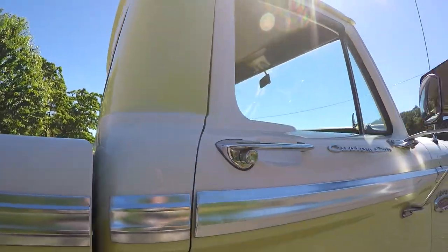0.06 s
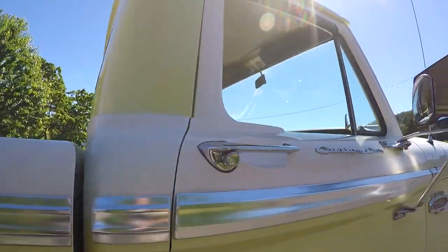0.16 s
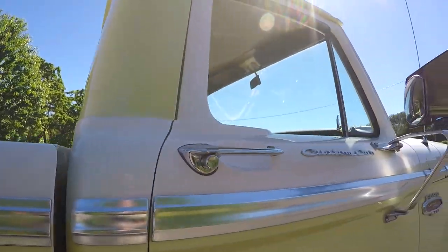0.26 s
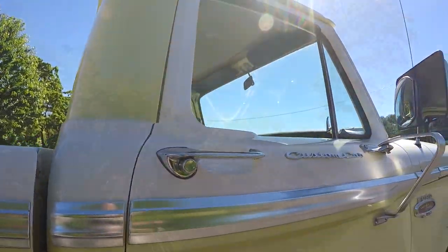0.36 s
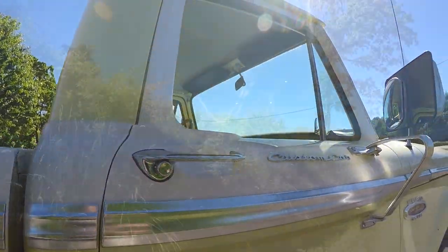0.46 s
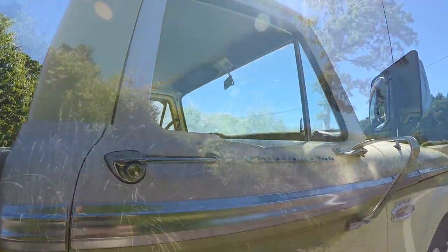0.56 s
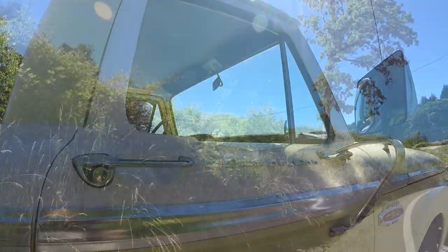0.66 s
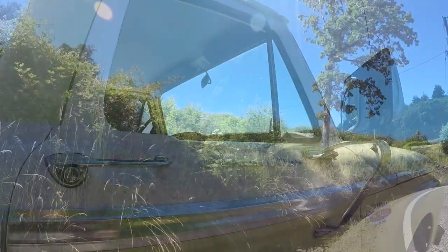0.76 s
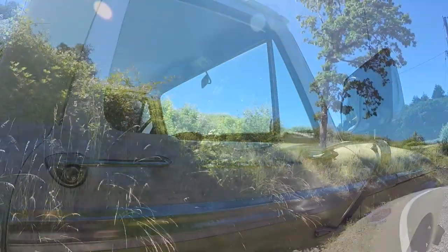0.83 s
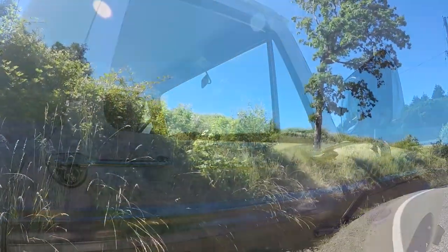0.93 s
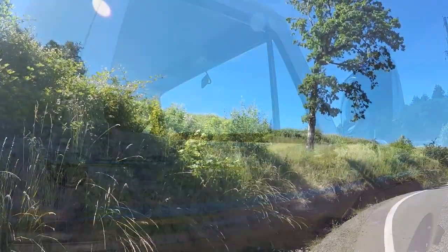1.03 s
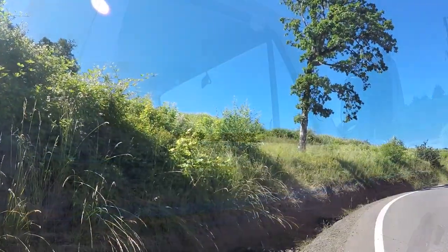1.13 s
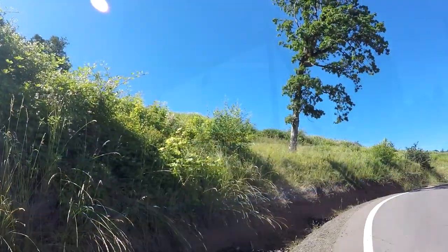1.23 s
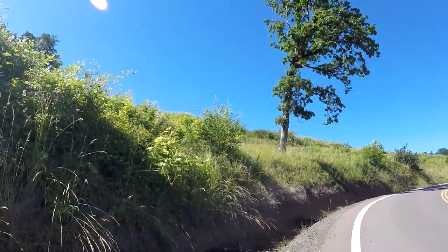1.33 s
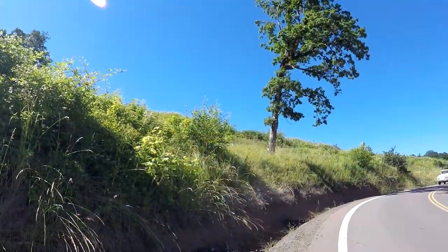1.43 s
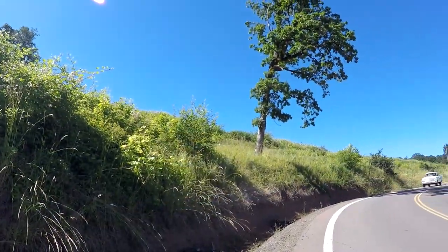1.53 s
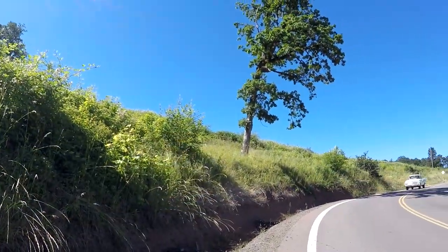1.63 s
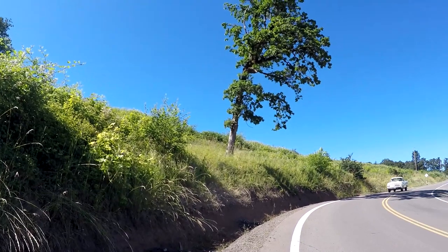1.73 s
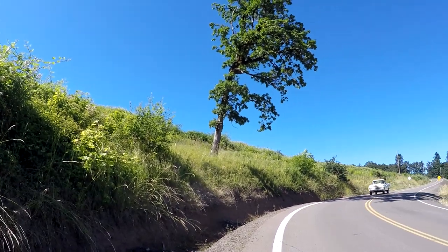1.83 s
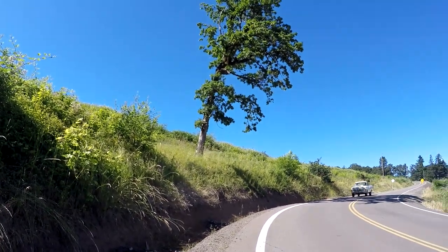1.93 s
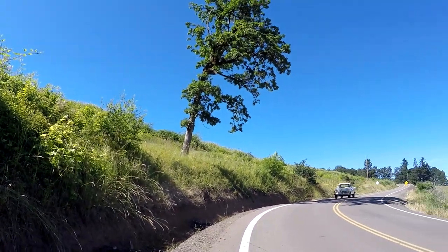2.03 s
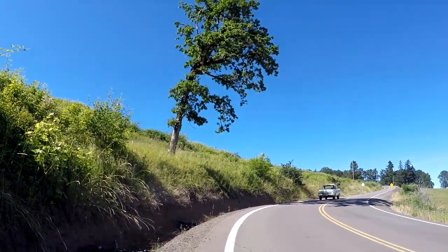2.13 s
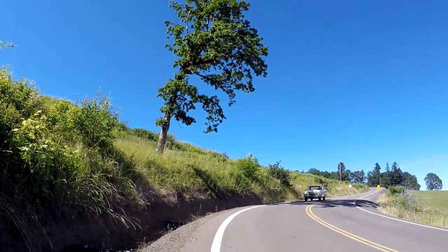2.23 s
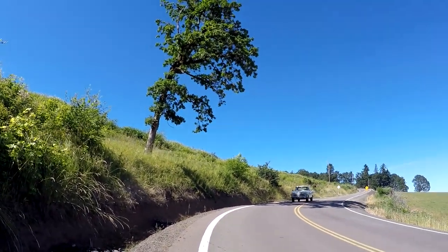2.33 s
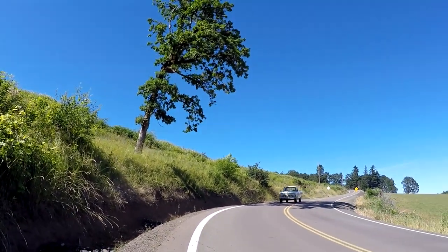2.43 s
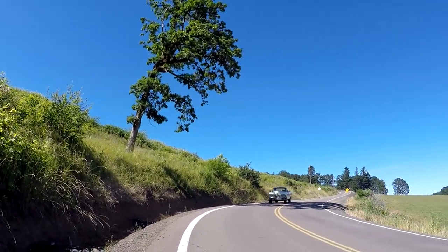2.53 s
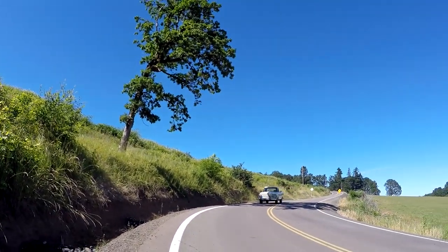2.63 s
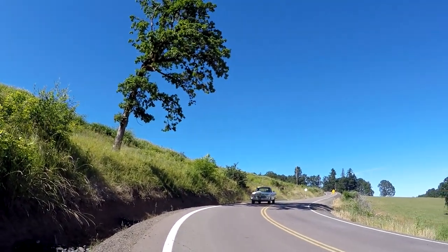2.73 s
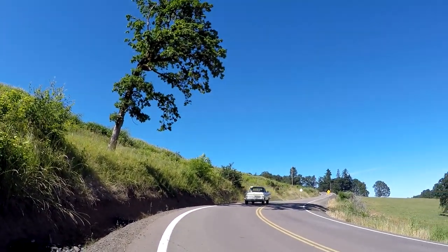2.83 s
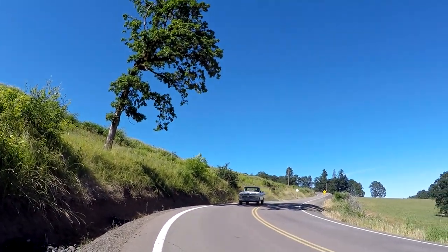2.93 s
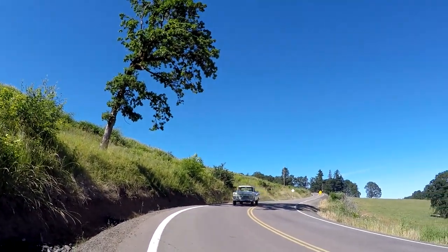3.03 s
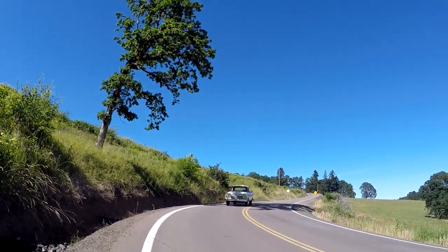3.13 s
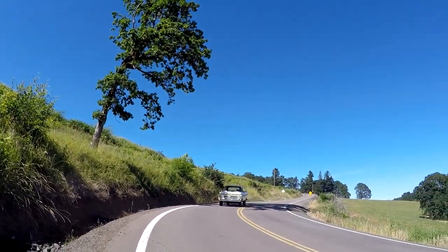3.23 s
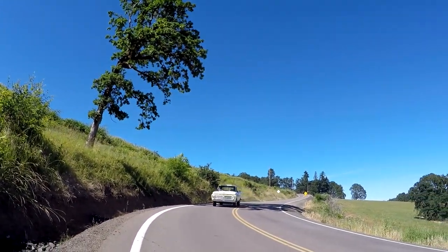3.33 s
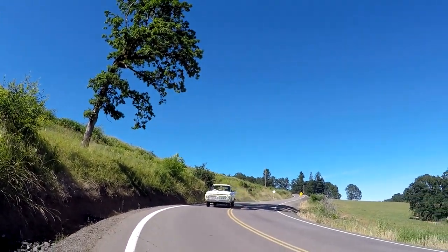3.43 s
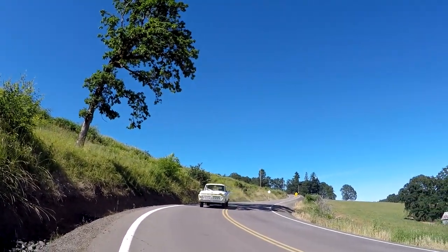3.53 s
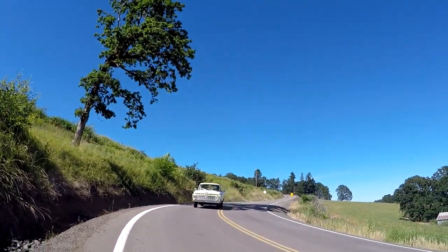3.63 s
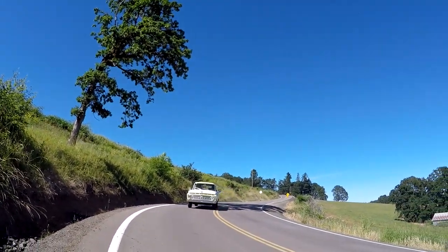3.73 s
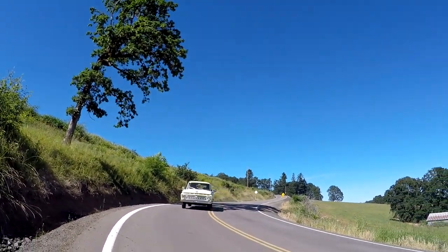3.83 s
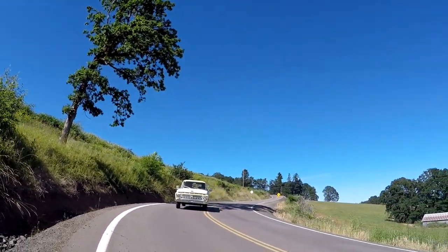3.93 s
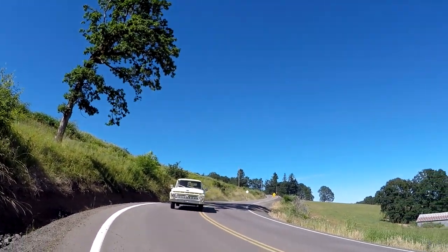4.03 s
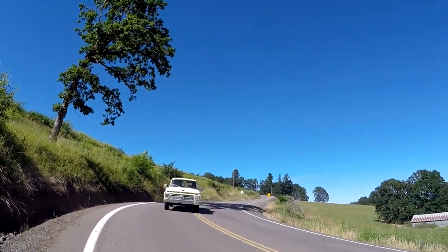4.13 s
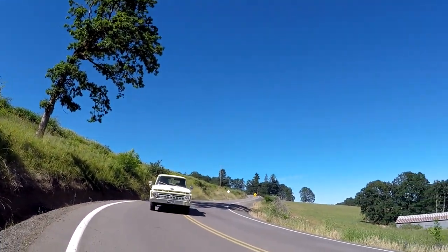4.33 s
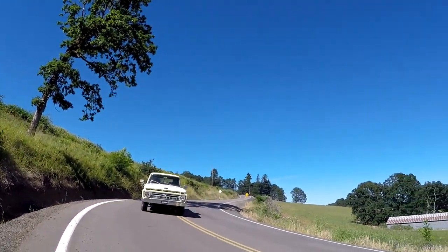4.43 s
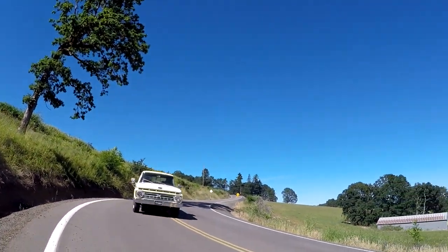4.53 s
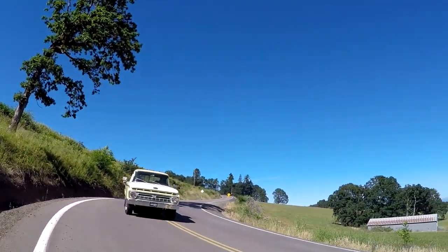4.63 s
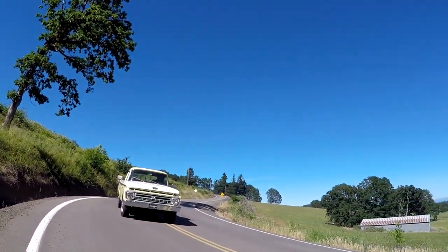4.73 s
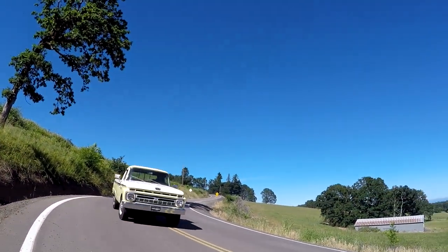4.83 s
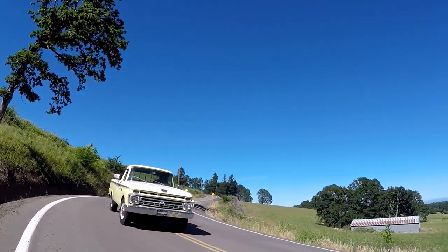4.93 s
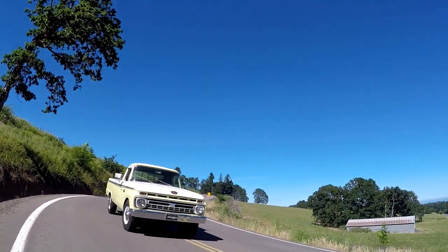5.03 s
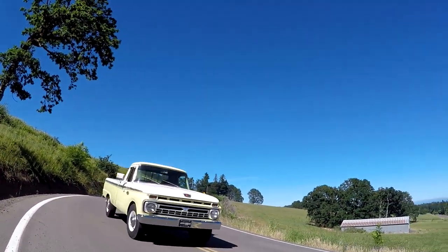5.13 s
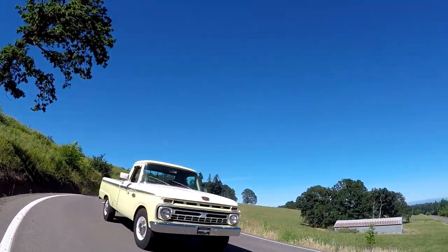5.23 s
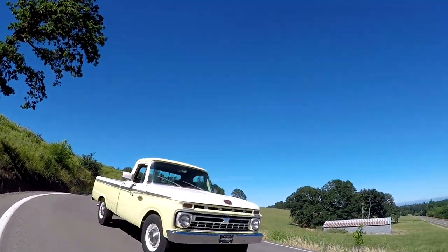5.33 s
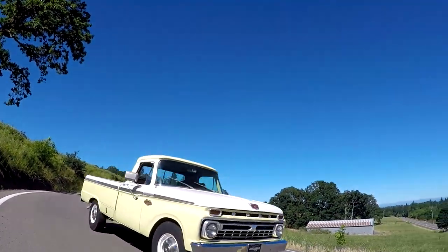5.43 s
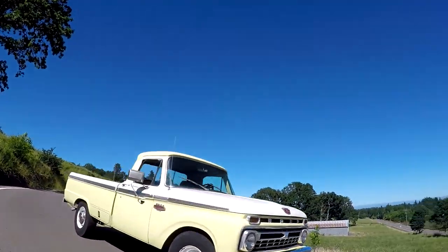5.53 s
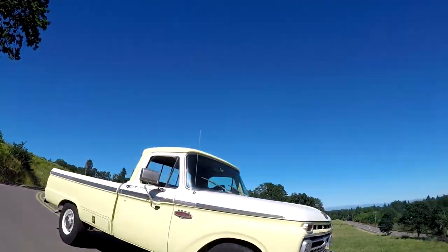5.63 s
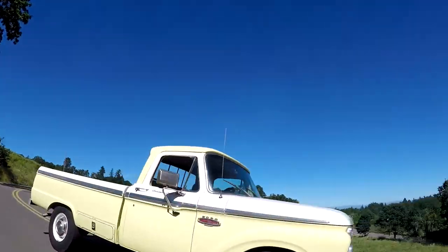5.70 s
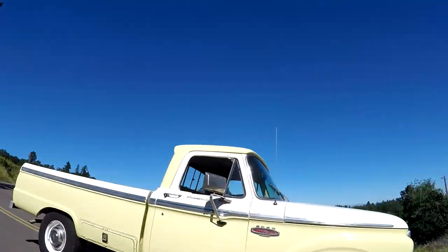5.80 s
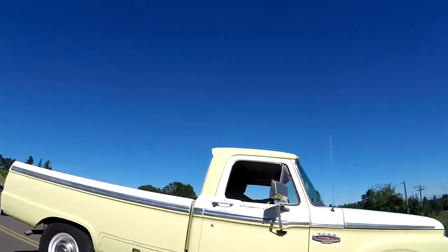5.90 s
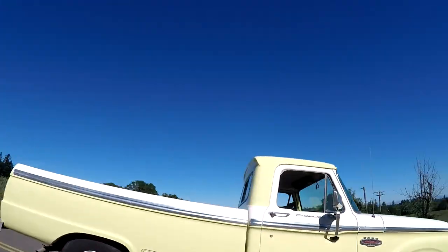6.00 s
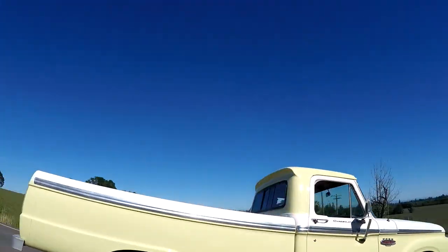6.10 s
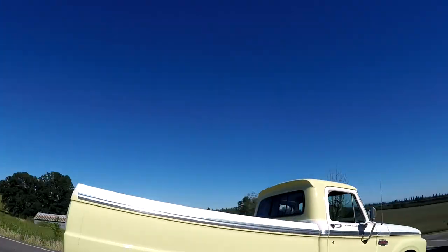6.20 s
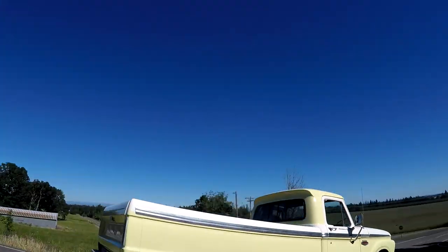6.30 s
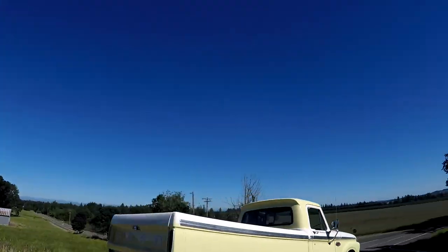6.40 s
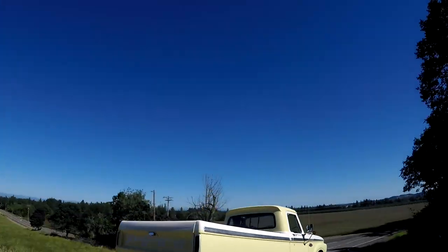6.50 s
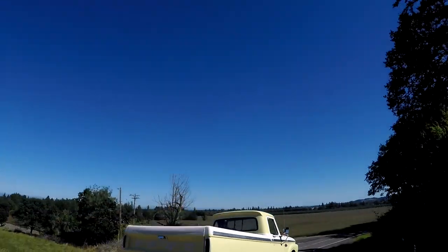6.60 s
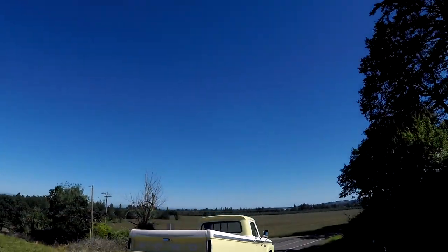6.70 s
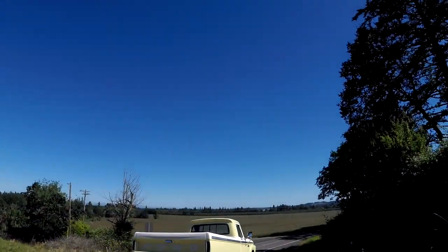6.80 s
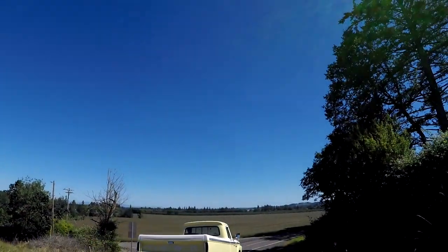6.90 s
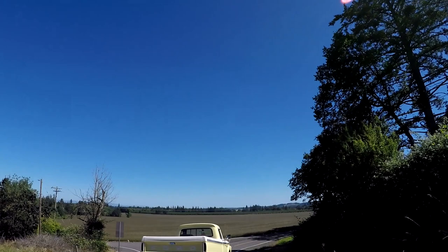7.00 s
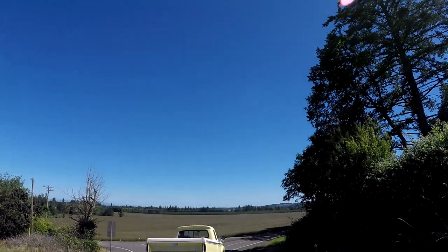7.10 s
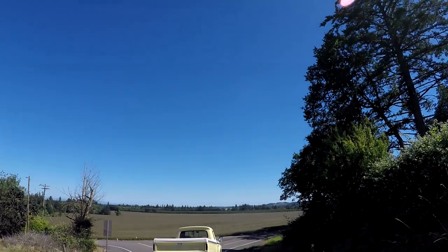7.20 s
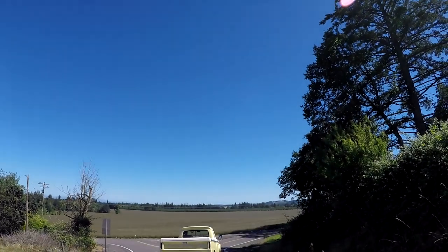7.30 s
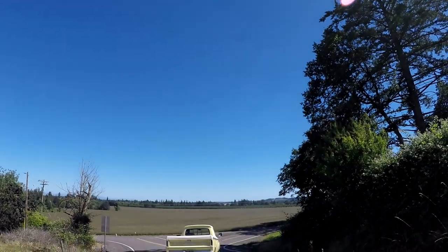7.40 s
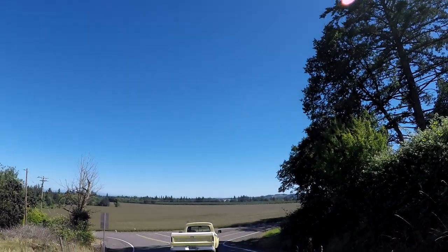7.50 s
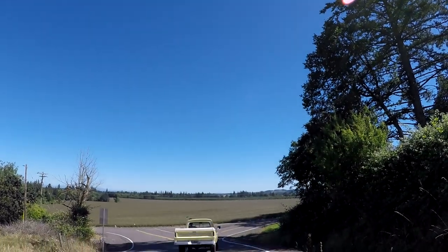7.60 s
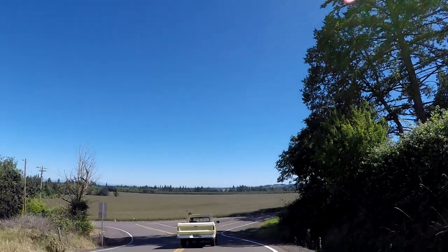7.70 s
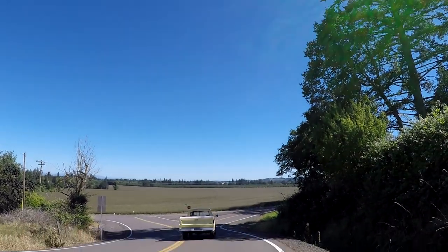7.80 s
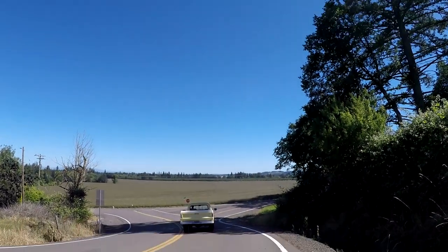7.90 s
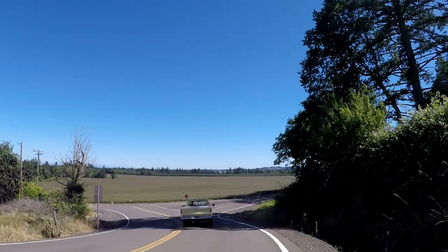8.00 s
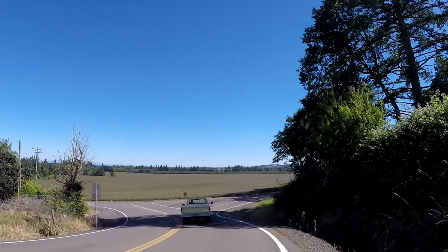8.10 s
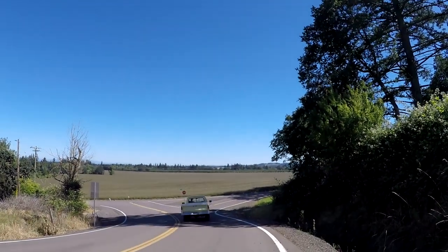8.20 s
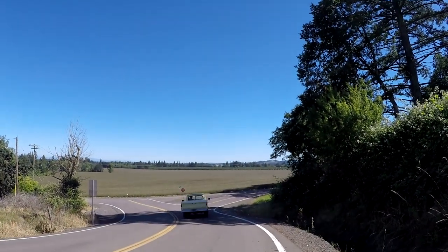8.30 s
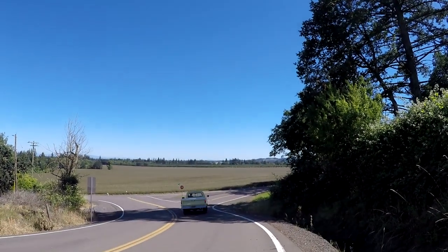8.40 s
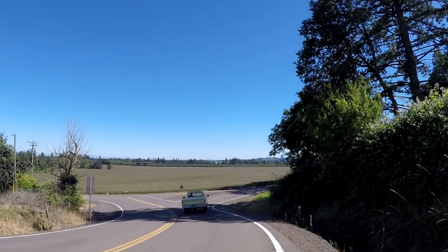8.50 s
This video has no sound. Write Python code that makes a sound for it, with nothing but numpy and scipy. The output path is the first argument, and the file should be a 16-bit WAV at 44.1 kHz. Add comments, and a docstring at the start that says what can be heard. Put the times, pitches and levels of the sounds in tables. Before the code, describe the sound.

From 0 to 0.8 s there is a quiet low background with a fading hum, overlaid by very close microphone-housing ticks, a stronger knock near 0.44 s, grainy rubs, and a loud dry snap at 0.73 s. At 0.82 s a tiny gap and click cut abruptly to an open road. An old V8 pickup is heard far off as a steady low drone, about 100 Hz, with soft rumble and tyre hiss. It slowly grows, its pitch sagging slightly until about 5 s, a faint breathy whine appearing from 4 s. Between 5 and 6.3 s it passes close: full tyre roar, brief swishes, a faint tread song and lumpy, uneven exhaust burble, peaking near 6 s. Then it recedes, duller and throbbing, its engine note rising slightly. Deep wind gusts thump intermittently, strongest around 6.9 and 7.8 to 8.1 s; sparse ticks occur at 7.3 and 8.4 s. It ends abruptly at about 8.5 s.

```python
"""Beside a parked pickup: low background and hum; the microphone housing ticks and is rubbed, then snaps once.
A cut: short pressure sag, click, then the road. An old V8 pickup nears, passes and pulls away. Its exhaust is
wavering sines plus pulses through two pipe bands; its tyres are banded noise with echoes off bank and road.
On the road, gusts of deep-bass noise thump on the microphone; a faint whine comes in, then breathy tyre
swishes and, as the truck leaves, a few more ticks. All sources are noise, sines or pulses shaped by tables."""
import sys
import numpy as np
from scipy import signal
from scipy.io import wavfile

SR = 44100
rng = np.random.default_rng(int(sys.argv[2]) if len(sys.argv) > 2 else 0)


def generate_wav(signal):
    """Clip the signal to [-1, 1] and save it as 16-bit WAV at the path in sys.argv[1]."""
    frames = np.transpose(np.atleast_2d(signal))
    scaled = np.clip(frames, -1, 1) * 32767
    pcm = np.round(scaled).astype(np.int16)
    wavfile.write(sys.argv[1], SR, pcm)


N = 377055
TIME = np.arange(N) / SR

# parked background, relative spectrum: f/Hz, density/dB per Hz
STILL_SPECTRUM = [(15, -36), (25, 9.5), (93, -1), (172, -9), (271, -23), (350, -21.5), (450, -26),
                  (1090, -30.5), (2020, -37), (2240, -37), (4870, -54), (7500, -59), (12400, -57),
                  (15000, -81)]
# parked background: t/s, level/dB
STILL_LEVEL = [(0, -36), (.2, -39), (.42, -38.5), (.49, -33), (.53, -38.5), (.65, -34.5), (.82, -33)]
# low wavering hum: f/Hz, level at t=0/dB, slope/(dB/s)
HUM = [(92.5, -43, -2), (123, -50, -12), (158.5, -46.5, -10), (228, -51, -26), (244, -50, -26),
       (345, -58.5, -40)]
# housing ticks: t/s, level before decay and swell/dB, f/Hz, swings to -60 dB
TICKS = [(0.068, -33, 1120, 12), (0.134, -39, 930, 24), (.189, -39, 1160, 12), (.223, -30, 1980, 15),
         (.231, -37, 1100, 8), (.244, -31, 950, 10), (.252, -34, 1400, 9), (.264, -35, 1000, 14),
         (.273, -39, 2600, 8), (.288, -42, 2200, 8), (.258, -34, 900, 15), (0.271, -29, 940, 17),
         (.288, -34, 900, 9), (.301, -35, 720, 7), (.311, -41, 1300, 4), (.325, -40, 1100, 9),
         (0.439, -15.5, 1300, 2.5), (0.441, -19, 430, 9), (.442, -30, 1500, 4), (.45, -33, 2400, 10),
         (.447, -30, 790, 28), (.453, -31, 1050, 14), (0.456, -24.5, 620, 8), (.476, -29, 890, 15),
         (.539, -33, 6500, 6), (.546, -37, 5000, 4), (0.594, -26, 6000, 4), (.594, -38, 2500, 3),
         (0.604, -31, 1700, 6), (.624, -40, 1900, 11), (.64, -30, 2400, 12), (.6405, -41, 7000, 7),
         (.682, -36, 6800, 7), (.712, -46, 2600, 9), (.76, -39, 2800, 15), (0.779, -36, 815, 17),
         (.799, -28, 905, 15), (0.801, -26, 3200, 23), (0.802, -20.5, 770, 19), (.805, -28, 1500, 14),
         (.817, -35, 1900, 9), (.804, -34, 3100, 20), (.816, -26, 775, 30), (7.286, -15, 904, 4),
         (7.286, -28, 2200, 5), (8.359, -27, 4200, 15), (8.359, -50, 7800, 2), (8.45, -30, 1990, 15),
         (8.45, -32, 6000, 9)]
TICK_RISE = 0.072   # share of t60
# housing rubs: start/s, end/s, level/dB, centre f/Hz, width/octaves, swell exponent (small = sudden start)
RUBS = [(0.173, 0.337, -50, 1020, 1.7, 1.15), (0.21, 0.297, -62, 4460, 1.4, 3.8),
        (.3, 0.43, -69, 2800, 2.2, 0.97), (0.439, 0.467, -41, 1100, 3.4, 0.63),
        (0.453, 0.475, -60, 5500, 2.2, .4), (0.47, 0.486, -50, 2000, 2, .8),
        (0.489, 0.544, -43, 2000, 2.5, 1.45), (.495, .542, -56, 7400, 2.1, 1.2),
        (0.517, 0.762, -60, 2140, 2, 0.92), (0.743, 0.807, -57, 1500, 3.1, 1.2),
        (0.791, 0.84, -44, 2160, 1.1, 0.71), (0.798, 0.824, -52, 6500, 1.7, .6)]
SNAP_S, SNAP_HALF_S, SNAP_DB = .73422, .00023, 8
# after-ring of the snap: f/Hz, level/dB, t60/s, first swing (1 push, -1 pull)
SNAP_RINGS = [(3400, -14, .0075, -1), (450, -0.7, .0028, 1), (150, -3, .014, -1), (4050, -23, .008, -1),
              (4760, -14.5, .006, -1), (9340, -15.5, .003, -1)]
CUT_S, RESTART_S, FADE_S = .8215, .8295, .006
SAG = -.045   # pressure reached at the end of the gap, full scale = 1

# engine speed: t/s, firing rate/Hz
SPEED = [(.83, 102.7), (1.35, 102), (2.1, 101.1), (2.85, 100), (3.35, 97.6), (3.6, 95.3), (4.1, 92.8),
         (4.4, 92), (4.9, 91.8), (5.4, 92.7), (6, 93.6), (6.4, 93), (7.1, 94.5), (7.6, 96.9), (8.55, 102)]
# exhaust: t/s, firing note level/dB, low bank burble level/dB, uneven cylinders level/dB
ENGINE = [(.83, -25, -33, -38), (1.6, -21, -47.5, -43.5), (2.35, -21, -39, -40), (2.85, -18.5, -41, -37),
          (3.3, -23, -46, -33.5), (4.1, -26.5, -53, -32.5), (4.35, -29.5, -38, -33), (4.6, -22, -45, -26),
          (4.9, -34, -25, -40), (5.15, -19, -30, -34), (5.35, -28.5, -19, -32), (5.6, -25.5, -25, -38),
          (5.85, -24, -15, -35), (6.1, -28, -19, -22), (6.35, -33, -18, -26.5), (6.6, -19, -18, -34),
          (6.85, -19.5, -24, -37), (7.1, -19.5, -24.5, -22.5), (7.35, -20, -29, -30.5),
          (7.6, -16.5, -41, -24.5), (7.9, -21, -38, -31), (8.35, -20, -39.5, -30.5),
          (8.55, -21.5, -49, -30)]
# burble as side and tail turn: t/s, ninth multiple level/dB, high burble level/dB, side burble level/dB
BURBLE = [(.83, -39.5, -44, -53), (1.75, -42, -40, -56), (2.25, -47, -36, -44), (2.75, -29, -36, -50),
          (3.25, -29.5, -37, -39), (3.75, -29, -29.5, -42), (4.25, -27.5, -31.5, -32),
          (4.75, -24, -31, -28.5), (5.25, -24, -28, -25.5), (5.75, -27, -22.5, -23),
          (6.25, -25, -20.5, -23), (6.75, -30, -24, -27), (7.25, -31, -22, -32),
          (7.75, -32.5, -29.5, -30.5), (8.25, -34, -31, -45), (8.55, -34, -20, -41)]
# families of the four-stroke cycle (firing rate / 8), {multiple: relative level/dB}: firing note
FIRING = {8: 0.0, 16: -54.5, 24: -33.5}
# uneven rhythm of each bank, odd multiples: {multiple: relative level/dB}
LOW_BURBLE = {5: 0.0, 3: -8.5}
# uneven cylinders: {multiple: relative level/dB}
UNEVEN = {10: 0.0, 12: -3.3, 4: -14, 6: -3, 7: -9.5, 14: -9.5, 16: -13, 18: -15.5}
# ninth multiple: {multiple: relative level/dB}
NINTH = {9: 0.0}
# heard more from behind: {multiple: relative level/dB}
HIGH_BURBLE = {11: 0.0, 15: -13, 19: -17.5}
# heard more from front and side: {multiple: relative level/dB}
SIDE_BURBLE = {13: 0.0, 17: -8, 21: -16.5}
# bark of single firings: t/s, low pipe level/dB, high pipe level/dB
BARK = [(.83, -48, -53), (1.3, -49, -53), (1.5, -45, -41.5), (1.7, -43, -48.5), (3.5, -42.5, -48.5),
        (4.2, -44, -41.5), (4.65, -32.5, -54), (5.2, -32.5, -43), (5.5, -27.5, -59), (5.85, -25, -38),
        (6.0, -21, -27.5), (6.18, -27.5, -28.5), (6.3, -25, -42), (6.55, -30, -41), (6.69, -22.5, -59),
        (6.8, -29.5, -37), (7.1, -31, -46.5), (7.65, -33, -39), (7.9, -37, -45), (8.3, -36.5, -44),
        (8.45, -41, -35.5), (8.55, -31, -32.5)]
# pipe bands: low edge f/Hz, high edge f/Hz
PIPES = [(170, 255), (275, 345)]
# firings in turn at the near tailpipe: relative level/dB
CYLINDERS_DB = [1, -16.5, 2, 2, -6, -4.5, -2, -10]
FIRING_SPREAD_DB, FIRING_JITTER_S = 3, .0012

# truck on the bending road: t/s, distance/m
DISTANCE = [(.83, 39), (1.6, 31.3), (2.5, 24.5), (3.3, 19), (4, 17), (4.6, 12.4), (5.1, 8.7), (5.45, 5.7),
            (5.75, 5.1), (6.1, 5.66), (6.5, 8.8), (6.9, 10.9), (7.4, 13.2), (7.9, 16.6), (8.2, 17.8),
            (8.55, 15.3)]
REFERENCE_M, SIDE_ON_S, TURN_S = 5.05, 6.08, 0.69
# pass laws, rumble: level at REFERENCE_M side-on/dB, share of 1/r loss, front-to-rear change/dB
RUMBLE_LAW = (-17, 0.77, 3.7)
# tyres: level at REFERENCE_M side-on/dB, share of 1/r loss, front-to-rear change/dB
TYRE_LAW = (-27.5, 0.86, 2.8)
# truck hiss: level at REFERENCE_M side-on/dB, share of 1/r loss, front-to-rear change/dB
HISS_LAW = (-41.5, 1.076, -3.5)
# tyre treble loss/(dB/kHz): at REFERENCE_M side-on, added per metre, front-to-rear change
TREBLE_LOSS = (0.5, 0.066, 2.94)
HISS_LOSS_DB_PER_KHZ_M = .01
# rumble, relative spectrum: f/Hz, density/dB per Hz
RUMBLE_SPECTRUM = [(40, -15.5), (70, -1), (88, -6), (105, 6), (125, -0.5), (150, -1), (180, -12),
                   (230, -11.5), (330, -18), (500, -29), (800, -31)]
# tyre roar, relative spectrum: f/Hz, density/dB per Hz
TYRE_SPECTRUM = [(200, -26), (400, -0.5), (600, 1.5), (950, -2), (1160, -4.5), (1500, -4), (1800, -8),
                 (2200, -9.5), (3000, -9), (3600, -14), (5500, -23.5), (7500, -32), (11200, -53.5),
                 (15500, -48.5)]
# airy truck hiss, relative spectrum: f/Hz, density/dB per Hz
HISS_SPECTRUM = [(3300, -6.5), (4200, -1.5), (5200, -8), (6500, -9.5), (8500, -18), (12000, -23)]
# drifting hollow in roar treble: t/s, f/Hz, depth/dB
HOLLOW = [(.83, 3040, 5), (2.3, 2970, 2.5), (2.9, 3200, 6.5), (3.6, 3240, 7.5), (4.1, 3300, 2.5),
          (4.6, 3770, 1.5), (5.2, 3430, 2.5), (6.8, 3500, 1), (7.9, 3140, 6.5), (8.55, 3100, 2.5)]
HOLLOW_OCTAVES = 0.28   # half-width at 1/e depth
# inverted echo off the roadside bank on approach: t/s, lag/ms, level re direct/dB
BANK_ECHO = [(.83, 1.47, -15), (1.8, 1.47, -13), (2.7, 1.47, -10), (3.5, 1.5, -14), (4.1, 1.45, -6),
             (4.6, 1.27, -4), (5.05, 1.15, -6), (5.4, 1.1, -25), (8.55, 1.1, -40)]
# echo off the road as the truck passes and leaves: t/s, lag/ms, level re direct/dB
ROAD_ECHO = [(.83, .9, -40), (5.4, .9, -25), (5.8, .84, -12), (6.3, .8, -7), (6.7, .72, -11),
             (7.1, .62, -10), (7.6, .65, -16), (8.55, .7, -16)]
ECHO_CUT_HZ = 1500   # grass and grit return less treble
# tread song: t/s, f/Hz, level/dB
SONG = [(.83, 916, -59), (2.7, 931, -63.5), (3.9, 880, -67), (4.3, 850, -50), (4.66, 931, -52),
        (5.15, 986, -39), (5.45, 922, -40), (5.7, 952.3, -34), (5.9, 966, -36.5), (6.1, 1000, -37),
        (6.3, 1011, -41), (6.7, 987, -45), (6.9, 1044, -58), (7.05, 1227, -44), (7.4, 1085, -44),
        (7.7, 1000, -54), (8.2, 1080, -54), (8.55, 1036, -44)]
# gusts: middle t/s, level/dB, half-width at 1/e/s
GUSTS = [(.83, -29, 0.17), (1.17, -37, 0.044), (1.45, -28, 0.043), (2.06, -39, 0.036), (4.53, -27, 0.17),
         (4.899, -29, 0.11), (6.45, -33, 0.15), (6.871, -19.5, 0.058), (7.5, -28.5, 0.11),
         (7.85, -18, 0.28), (8.064, -14.5, 0.027), (8.39, -29, 0.092)]
WIND_LOW_HZ, WIND_HIGH_HZ = 19, 50.3
BREEZE_DB, BREEZE_LUMPS_DB = -38.5, 3.5
# faint breathy whine: t/s, f/Hz, level/dB
WHINE = [(3.9, 4200, -75), (4.2, 4230, -58), (4.4, 4300, -52), (4.75, 4550, -50), (4.9, 4450, -55),
         (5.1, 4380, -54), (5.25, 4380, -56), (5.4, 4100, -52), (5.5, 4200, -56), (5.64, 4200, -50),
         (5.76, 4200, -47), (5.82, 4180, -58), (6.0, 4150, -85)]
SONG_BLUR_HZ, WHINE_BLUR_HZ = 74, 90
# tyre swishes: start/s, end/s, from f/Hz, to f/Hz, level/dB
SWISHES = [(5.4, 5.62, 620, 700, -42), (5.56, 5.76, 1580, 1720, -42), (5.59, 5.7, 4700, 4950, -45),
           (5.85, 6.15, 1900, 2000, -45), (6.7, 7.1, 1350, 1280, -50)]
CUTOFF_HZ = 15700


def from_db(db):
    """Decibels to gain."""
    return np.exp(np.asarray(db) * (np.log(10) / 20))


def rms_one(x):
    """Scale to rms 1."""
    return x / np.sqrt(np.mean(x ** 2) + 1e-20)


def in_time(rows):
    """Table columns as curves, linear between rows, one value a sample."""
    s, *columns = np.transpose(rows)
    return [np.interp(TIME, s, c) for c in columns]


def progress(t, start_s, end_s):
    """Share of an interval elapsed, held at 0 and 1 outside it."""
    return np.clip((t - start_s) / (end_s - start_s), 0, 1)


def band_sos(order, edges_hz):
    """Butterworth band-pass sections."""
    return signal.butter(order, edges_hz, "band", fs=SR, output="sos")


def drift(rate_hz, size=N):
    """Slow chance, rms 1: noise at SR/40 through a double one-pole low-pass, joined linearly."""
    r = np.exp(-80 * np.pi * rate_hz / SR)
    noise = rng.standard_normal(N // 40 + 2002)
    slow = signal.lfilter([1], [1, -2 * r, r * r], noise)[2000:]   # settling dropped
    return np.interp(np.arange(size) / 40, np.arange(len(slow)), rms_one(slow))


def ring(at_s, hz, level_db, t60_s, rise=0):
    """Decaying sine; swells over rise * t60, or starts at once."""
    out, start = np.zeros(N), round(at_s * SR)
    t = np.arange(min(int(1.5 * t60_s * SR), N - start)) / SR
    swell = np.clip(t / (rise * t60_s + 1e-9), 0, 1)
    decay = from_db(level_db - 60 * t / t60_s)
    out[start:start + len(t)] = swell * decay * np.sin(2 * np.pi * hz * t)
    return out


def banded_noise(spectrum, patchy_db, loss_db_per_khz=0, hollow=(1000, 0), size=N):
    """Third-octave noise bands, each flickering; scaled to about rms 1 before flicker, hollow and loss."""
    hz_points, db_points = np.transpose(spectrum)
    octaves = np.log2(hz_points[-1] / hz_points[0])
    edges = hz_points[0] * 2 ** np.arange(0, octaves + .3, 1 / 3)
    white = rng.standard_normal((2, size))   # alternate bands use separate noises
    together, out, power = drift(32.0, size), 0, 0
    hollow_hz, hollow_db = hollow
    for k, edge_pair in enumerate(zip(edges, edges[1:])):
        hz = np.sqrt(edge_pair[0] * edge_pair[1])
        level_db = np.interp(np.log(hz), np.log(hz_points), db_points)
        band = signal.sosfilt(band_sos(2, edge_pair), white[k % 2])
        power += from_db(2 * level_db) * np.mean(band ** 2)
        flicker = together + .6 * drift(4.3, size) + drift(43, size)
        dip_db = hollow_db * np.exp(-(np.log2(hz / hollow_hz) / HOLLOW_OCTAVES) ** 2)
        loss_db = dip_db + loss_db_per_khz * hz / 1000
        out = out + band * from_db(level_db - loss_db + patchy_db * flicker)
    return out / np.sqrt(power)


def narrow_hiss(hz, level_db, blur_hz):
    """Gliding tone blurred by fast chance in quadrature into a narrow band."""
    turns = 2 * np.pi * np.cumsum(hz) / SR
    return from_db(level_db) * (drift(blur_hz) * np.sin(turns) + drift(blur_hz) * np.cos(turns))


def stillness():
    """Low banded noise plus humming sines wavering in level and phase; first second only."""
    t, hum = TIME[:SR], 0
    for hz, db, slope in HUM:
        level = from_db(db + slope * t + 2.5 * drift(3, SR))
        hum = hum + level * np.sin(2 * np.pi * hz * t + .5 * drift(3, SR))
    level = from_db(in_time(STILL_LEVEL)[0][:SR])
    background = level * banded_noise(STILL_SPECTRUM, patchy_db=.5, size=SR)
    return np.pad(background + hum, (0, N - SR))


def ticks():
    """Housing modes: short decaying sines with a brief swell."""
    return sum(ring(s, hz, db, swings / hz, TICK_RISE) for s, db, hz, swings in TICKS)


def rubs():
    """Friction on the housing: one grainy noise, band-passed and swelled for each rub."""
    out = np.zeros(N)
    grains = rng.standard_normal(SR) * from_db(1.6 * drift(300)[:SR])
    for start, end, db, hz, octaves, swell in RUBS:
        edges = np.clip([hz * 2 ** (-octaves / 2), hz * 2 ** (octaves / 2)], 20, .45 * SR)
        band = rms_one(signal.sosfilt(band_sos(2, edges), grains))
        share = progress(TIME[:SR], start, end)
        out[:SR] += from_db(db) * band * np.abs(np.sin(np.pi * share ** swell)) ** 0.65
    return out


def snap():
    """One pull and one push of pressure, then short rings; the 450 Hz ring carries the push on."""
    halves = np.clip((TIME - SNAP_S) / SNAP_HALF_S, 0, 2)
    pulse = -from_db(SNAP_DB) * np.sin(np.pi * halves)
    end_s = SNAP_S + 2 * SNAP_HALF_S
    return pulse + sum(sign * ring(end_s, hz, db, t60) for hz, db, t60, sign in SNAP_RINGS)


def engine():
    """Exhaust harmonics: each cycle multiple is a sine wavering in level and phase."""
    firings_hz = in_time(SPEED)[0]
    cycles, out = np.cumsum(firings_hz / 8) / SR, 0
    # family, level waver/dB, phase waver/rad; order follows the ENGINE and BURBLE columns
    families = ((FIRING, .7, .2), (LOW_BURBLE, 1.2, .25), (UNEVEN, 1.6, .4),
                (NINTH, 1.6, .5), (HIGH_BURBLE, 2, .4), (SIDE_BURBLE, 1.5, .3))
    levels_db = in_time(ENGINE) + in_time(BURBLE)
    for (family, waver_db, waver_rad), level_db in zip(families, levels_db):
        for multiple, own_db in family.items():
            phase = 2 * np.pi * (multiple * cycles + rng.random()) + waver_rad * drift(6.7)
            level = from_db(level_db + own_db + waver_db * drift(3.6))
            out = out + np.sqrt(2) * level * np.sin(phase)   # sqrt(2): level is rms
    return out


def bark():
    """One pulse a firing, jittered in time and strength, uneven by cylinder, thumps through two pipe bands."""
    count = np.cumsum(in_time(SPEED)[0]) / SR
    at = np.flatnonzero(np.diff(np.floor(count)))
    late, strong = rng.standard_normal((len(at), 2)).T
    at = np.clip(at + (FIRING_JITTER_S * SR * late).astype(int), 0, N - 1)
    pulses = np.full(N, 1e-18)
    pulses[at] = from_db(np.resize(CYLINDERS_DB, len(at)) + FIRING_SPREAD_DB * strong)
    out = 0
    for edges, level_db in zip(PIPES, in_time(BARK)):
        resonance = band_sos(1, edges).repeat(2, axis=0)   # same section twice
        out = out + from_db(level_db) * rms_one(signal.sosfilt(resonance, pulses))
    return out


def passing():
    """Distance/m, and view of the truck from -.5 (front) to .5 (rear)."""
    return in_time(DISTANCE)[0], np.tanh((TIME - SIDE_ON_S) / TURN_S) / 2


def pass_gain(law):
    """Gain of a layer by distance loss and view."""
    side_on_db, share, rear_db = law
    metres, view = passing()
    return from_db(side_on_db - share * 20 * np.log10(metres / REFERENCE_M) + rear_db * view)


def rumble():
    """Low banded noise following the pass."""
    return pass_gain(RUMBLE_LAW) * banded_noise(RUMBLE_SPECTRUM, patchy_db=0.63)


def echo(x, rows):
    """Low-passed copy with a moving lag."""
    lag_ms, level_db = in_time(rows)
    late = np.interp(TIME - lag_ms / 1000, TIME, x)
    return from_db(level_db) * signal.lfilter(*signal.butter(2, ECHO_CUT_HZ, fs=SR), late)


def tyre_roar():
    """Roar and airy hiss, dulled by distance, hollowed, then combed by two short moving echoes."""
    metres, view = passing()
    beyond_m = metres - REFERENCE_M
    tyre_loss = TREBLE_LOSS[0] + TREBLE_LOSS[1] * beyond_m + TREBLE_LOSS[2] * view
    hiss_loss = HISS_LOSS_DB_PER_KHZ_M * beyond_m
    hollow = in_time(HOLLOW)
    roar = pass_gain(TYRE_LAW) * banded_noise(TYRE_SPECTRUM, 0.73, tyre_loss, hollow)
    hiss = pass_gain(HISS_LAW) * banded_noise(HISS_SPECTRUM, 1.0, hiss_loss, hollow)
    direct = roar + hiss
    return direct - echo(direct, BANK_ECHO) + echo(direct, ROAD_ECHO)


def tread_song():
    """Gliding narrow band of tread noise, flickering in level."""
    return narrow_hiss(*in_time(SONG), SONG_BLUR_HZ) * from_db(1.5 * drift(25))


def wind():
    """Lumpy deep-bass pressure swings on the microphone; Gaussian gusts over a breeze."""
    noise = rng.standard_normal(N)
    swings = rms_one(signal.sosfilt(band_sos(3, [WIND_LOW_HZ, WIND_HIGH_HZ]), noise))
    s = np.arange(0, N / SR + .002, .001)   # gust curve on a 1 ms grid
    curve = sum(from_db(db) * np.exp(-((s - mid_s) / half_s) ** 2) for mid_s, db, half_s in GUSTS)
    breeze = from_db(BREEZE_DB + BREEZE_LUMPS_DB * drift(2.9))
    return (np.interp(TIME, s, curve) + breeze) * from_db(2.0 * drift(23)) * swings


def whine():
    """Faint gliding narrow band of hiss."""
    return narrow_hiss(*in_time(WHINE), WHINE_BLUR_HZ)


def swishes():
    """Tyre swishes: narrow hisses that glide, swell and fade."""
    out = 0
    for start, end, from_hz, to_hz, db in SWISHES:
        share = progress(TIME, start, end)
        hz = from_hz + (to_hz - from_hz) * share
        out = out + np.sin(np.pi * share) * narrow_hiss(hz, db, WHINE_BLUR_HZ)
    return out


def scene():
    """Still scene, sagging gap that ends in a small click, then the road, briefly faded in and out."""
    before, after = TIME < CUT_S, TIME >= RESTART_S
    sounding = before | after
    gap = SAG * (TIME - CUT_S) / (RESTART_S - CUT_S) * ~sounding
    touches = (ticks() + rubs() + snap()) * sounding
    fade = after * np.clip(np.minimum(N / SR - TIME, TIME - RESTART_S) / FADE_S, 0, 1)
    truck = engine() + bark() + rumble() + tyre_roar() + tread_song() + whine() + swishes()
    return (before * stillness() + gap + touches + fade * (truck + wind()))[None]


def record(dry):
    """Clip overloads, then low-pass steeply."""
    low_pass = signal.cheby2(16, 80, CUTOFF_HZ, fs=SR, output="sos")
    return signal.sosfilt(low_pass, np.clip(dry, -.97, .97))


dry = scene()
out = record(dry)
generate_wav(out)
```